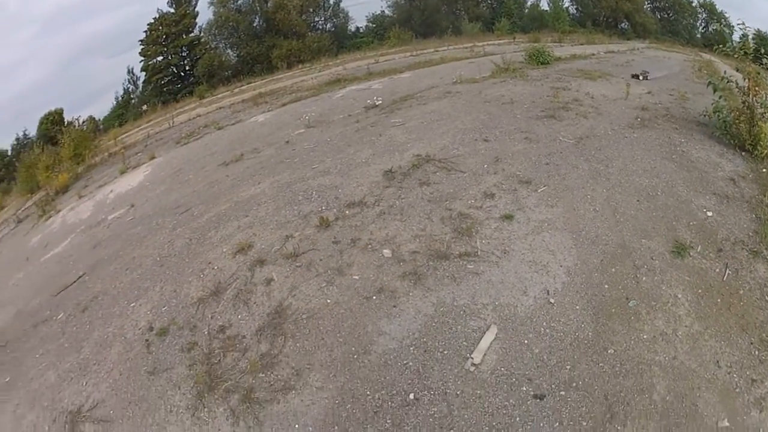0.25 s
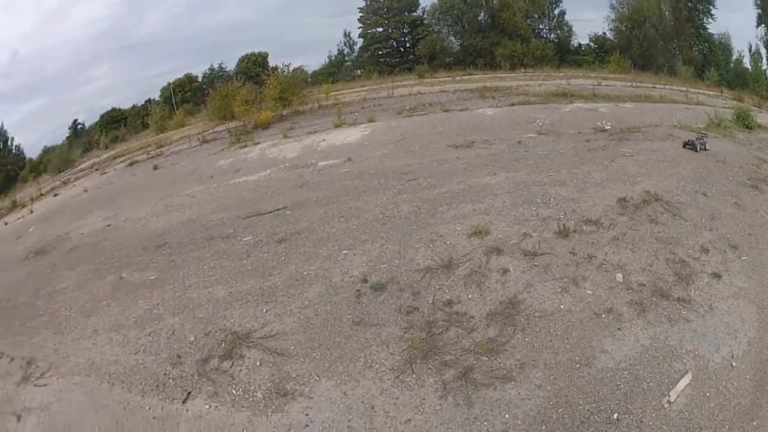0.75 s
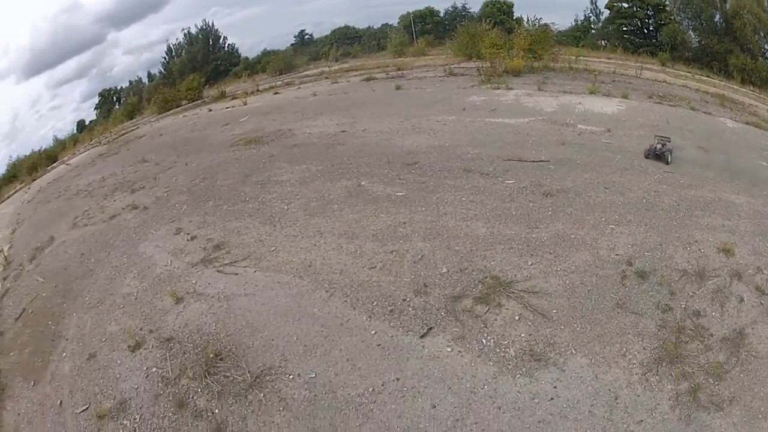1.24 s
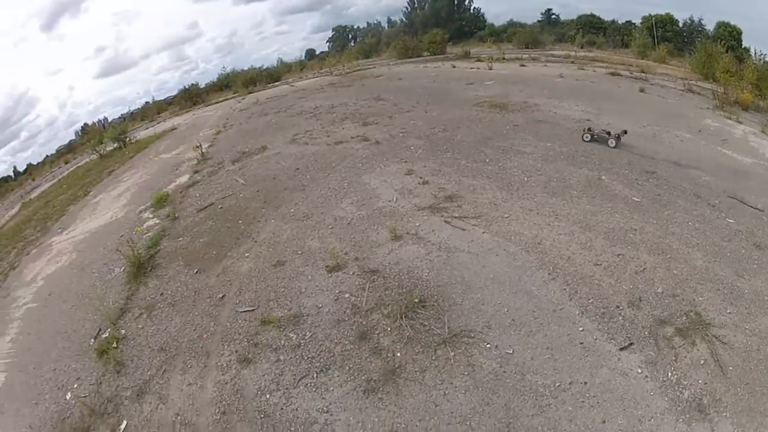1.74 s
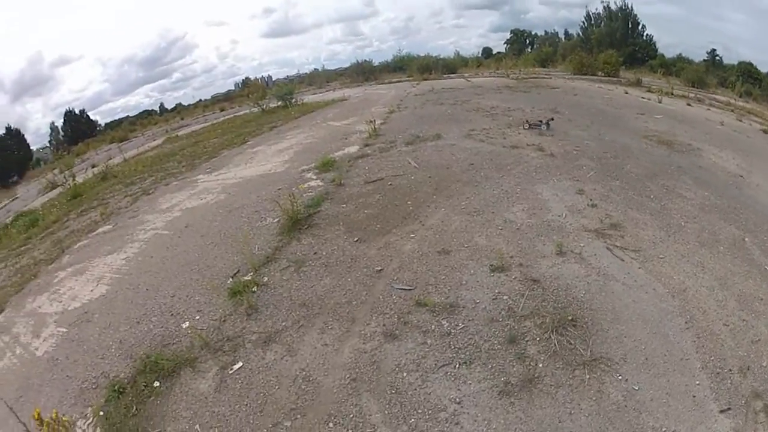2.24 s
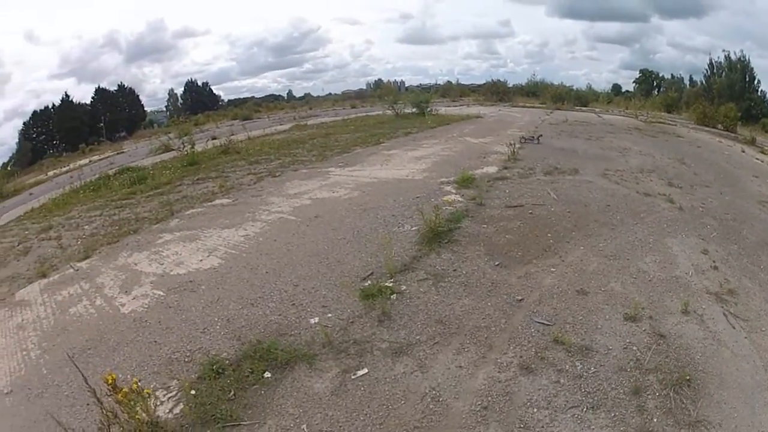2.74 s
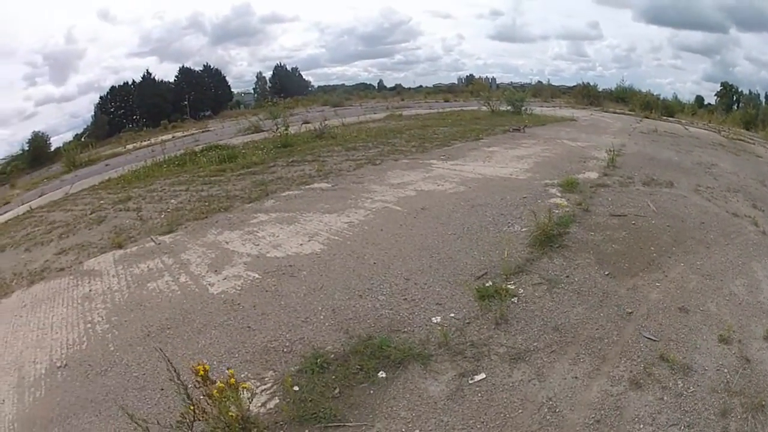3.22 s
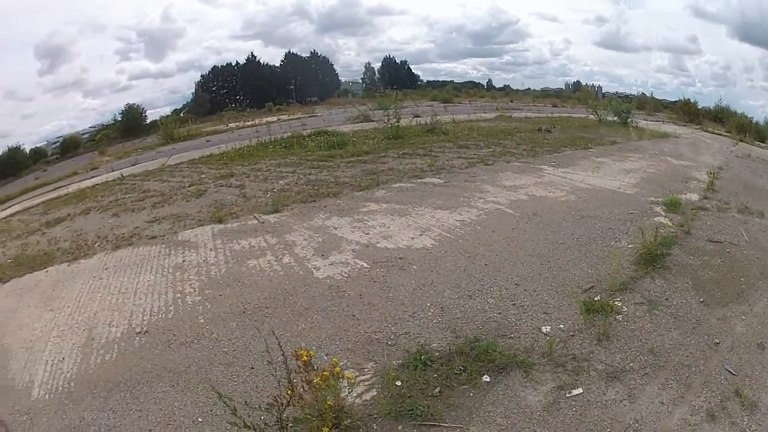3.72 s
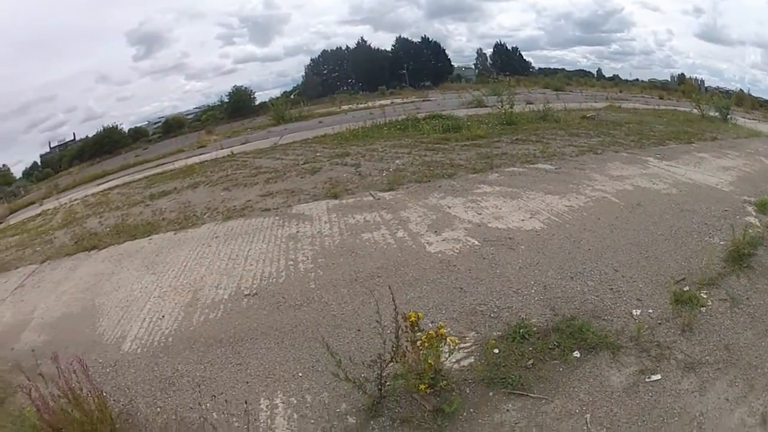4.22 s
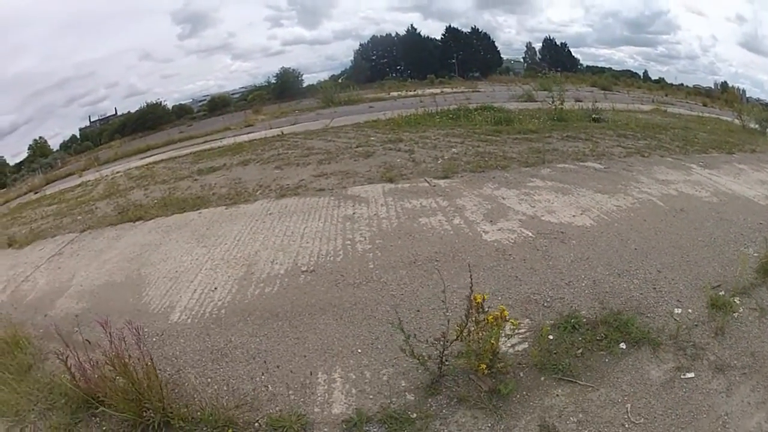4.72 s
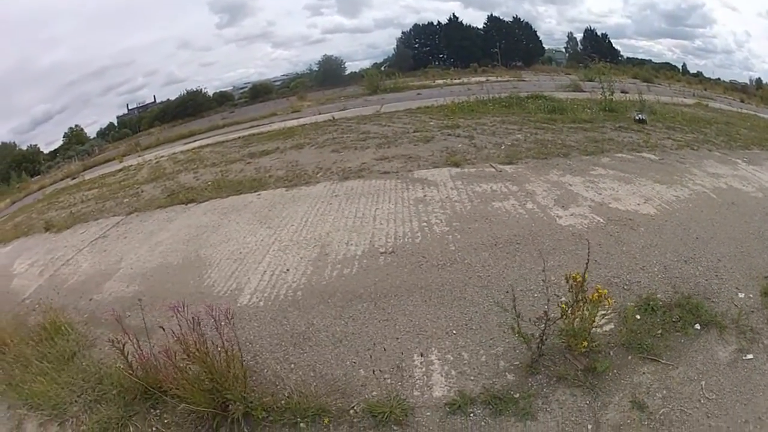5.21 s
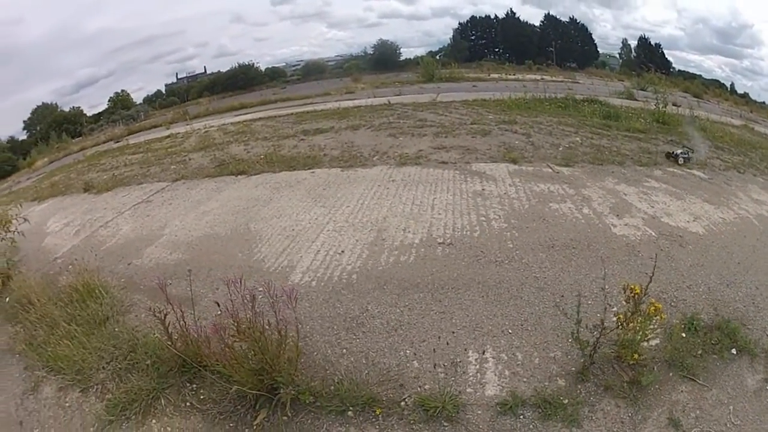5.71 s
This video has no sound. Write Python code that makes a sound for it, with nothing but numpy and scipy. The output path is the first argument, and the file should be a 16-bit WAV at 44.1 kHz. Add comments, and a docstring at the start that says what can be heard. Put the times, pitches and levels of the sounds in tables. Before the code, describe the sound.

A small fuel-powered model buggy races over gravelly tarmac outdoors, heard in mono. From the start its two-stroke engine buzzes and rasps at high, wavering revs, growing louder as it closes in during the first half second. Gears hiss above it, tyres scrub on grit, and a faint low rush lies underneath. The throttle blips near 0.9 seconds. At 2.1 seconds the car coasts and the pitch falls sharply, then barks back up at 2.3. At 3.1 it coasts longer, sinking to a quieter, rough burble, before picking up at 3.5. It runs farther away at steadier, lower revs, sounding fainter. Around 4.75 seconds a brief, thin gear whistle swells and fades as it turns. From 5 seconds it approaches again, louder, with quick rises and dips in pitch until the end at about 6 seconds.

```python
"""A nitro model buggy races over gravelly tarmac: its single two-stroke cylinder hums and rasps through
a tuned pipe, gears and tyres hiss above it. It closes in, coasts at 2.1 s and 3.1 s, each time followed
by a throttle blip, then runs out to 34 m. The gear case whistles as it turns back at 4.75 s, and it
closes in again. All is mono; a low-rate sample-and-hold mirrors the sound into the treble."""
import sys
import numpy as np
from scipy import signal
from scipy.fft import rfft, irfft
from scipy.io import wavfile
from scipy.ndimage import uniform_filter1d

SR = 44100
rng = np.random.default_rng(int(sys.argv[2]) if len(sys.argv) > 2 else 0)


def to_wav(s):
    """Save 16-bit WAV."""
    ch = np.atleast_2d(s).T  # columns
    pcm = np.round(np.clip(ch, -1, 1) * 32767)  # PCM
    wavfile.write(sys.argv[1], SR, pcm.astype(np.int16))


N = 262836
T = np.arange(N) / SR
FREQS = np.fft.rfftfreq(N, 1 / SR)
CRUISE_HZ = 310

# car's path: t/s, distance/m, pipe facing listener/0-1, lower and upper pipe mode at CRUISE_HZ/Hz
PATH = [(0, 19, 0.09, 1677, 2050), (.3, 12.6, .34, 1560, 2020), (.55, 8.4, 0.64, 1570, 2240),
        (1.1, 8.4, 0, 1676, 2070), (1.55, 10.2, 0.61, 1710, 2043), (1.8, 8.2, .58, 1593, 2155),
        (2.0, 9.4, .48, 1545, 2060), (2.6, 8.5, 0.67, 1540, 2154), (3.0, 10.24, 0.72, 1540, 2084),
        (3.35, 12.2, 0.55, 1672, 2182), (3.6, 23, 0.3, 1762, 2090), (3.85, 23, 0.62, 1483, 2020),
        (4.3, 33, 0.64, 1539, 2050), (4.55, 34, 0.58, 1786, 2080), (5.15, 21.5, 0.35, 1638, 2050),
        (5.32, 14.7, .25, 1738, 2048), (5.55, 10.5, 0.55, 1693, 2104), (5.96, 9.8, 0.63, 1667, 2040)]


def crank(firing_hz, rough, wobble=0.061, wobble_hz=26, shake=0.00905):
    """Crank angle in turns: the flywheel smooths, bouncing wheels rock the speed, firings vary."""
    bounce = unit(wander(7.64) * np.sin(2 * np.pi * wobble_hz * T))
    speed_ratio = 1 + wobble * rough ** 2 * bounce + shake * wander(170)
    return np.cumsum(uniform_filter1d(firing_hz, 350) * speed_ratio) / SR


def firings(turns, rough, jitter_turns=0.022, fade_db=2.5, shift_rad=0.9, smear_rad=0.3):
    """One uneven pulse a turn, smeared by the pipe; ground reflections fade and shift each order."""
    angle = 2 * np.pi * (turns + jitter_turns * rough * wander(89))
    pulses = np.zeros(N)
    for k in range(2, 20):
        fade = amp(fade_db * wander(14.4))
        pulses += fade * np.cos(k * angle + smear_rad * k * k + shift_rad * wander(4.1))
    return unit(pulses)


def exhaust(firing_hz, turns, pulses, rough, pull, muffler_db, lower_db, upper_db):
    """Pulses and gas noise pass the muffler, ring two pipe modes and bark under load."""
    # muffler and pipe responses: f/Hz, gain/dB
    muffler_gains = [(380, -15), (520, -9), (620, -9.5), (700, -3), (820, 0), (1050, 0), (1150, 1.5),
                     (1300, -10), (1500, -58)]
    pipe_gains = [(900, -30), (1100, -15), (1250, 10), (1400, 8), (1600, 6), (1850, 15.5), (2150, 6),
                  (2300, 3.5), (2480, -1.5), (2650, 0.5), (2950, -67), (3300, -41), (4000, -9)]
    strength = amp(2.0 * rough * wander(150))
    tone = (1 - rough) * strength * pulses
    gas = rough * strength * puffs(turns, floor=0.81, decay_turns=0.66)
    muffled = rfft(steady(colour(tone + 0.57 * gas, muffler_gains)))
    null_db = -5.5 * bell(FREQS, 958, 58)
    low_band = irfft(muffled * amp(null_db), N)
    bark = pull * amp(-9) * steady(irfft(muffled * bell(FREQS, 965, 280), N))
    drive = colour(tone + 0.76 * gas, pipe_gains)
    lower_hz, upper_hz = curves(PATH)[2:]
    rise_hz = firing_hz - CRUISE_HZ  # revs heat the gas and raise the modes
    lower = steady(resonate_twice(drive, lower_hz + 1.97 * rise_hz, width_hz=450))
    upper = steady(resonate_twice(drive, upper_hz + rise_hz, width_hz=500))
    return amp(muffler_db) * low_band + amp(lower_db) * (lower + bark) + amp(upper_db) * upper


def hum(turns, level_db, rough, flutter=0.21):
    """Firing fundamental from the pipe's mouth."""
    return amp(level_db) * np.sqrt(2) * np.sin(2 * np.pi * turns) * (1 + flutter * rough * wander(72))


def puffs(turns, floor, decay_turns):
    """Noise that bursts as the exhaust port opens, once a turn."""
    return unit((floor + np.exp(-(turns % 1) / decay_turns)) * rng.standard_normal(N))


def throttle(moves, travel_s=0.05):
    """Sum of throttle moves; each ramps in, holds and ramps out."""
    return sum(depth * np.clip(np.minimum(T - start_s, end_s - T) / travel_s + 0.5, 0, 1)
               for start_s, end_s, depth in moves)


def roughness(shut):
    """Uneven running, 0-1, raised by coasting and broken ground."""
    # broken ground: centre t/s, half length/s, added roughness/0-1
    bumps = [(.45, 0.38, 0.21), (0.936, 0.13, 0.25), (1.069, 0.052, 0.15), (1.63, 0.08, 0.33),
             (2.76, 0.53, 0.23), (4.18, 0.37, 0.2)]
    ground = sum(added * bell(T, centre_s, half_s) for centre_s, half_s, added in bumps)
    return np.clip(0.32 + 0.39 * shut + ground, 0, 1)


def exhaust_levels_db(firing_hz, shut, pull, near_m=10, settle_s=0.76):
    """Levels of hum, muffler and both pipe modes from distance, throttle, heading and revs."""
    # level laws: at near_m/dB, distance doubling/dB, shut/dB, pull/dB, facing/dB, over-rev/(dB/Hz)
    hum_law = (-24, -2.7, -14, .7, 8.7, -0.037)
    muffler_law = (-32, -0.64, -2, -2.5, -7, 0.0348)
    lower_law = (-19, -5.5, -13.5, -1.5, -0.3, -0.04)
    upper_law = (-21, -5, -7, 1.5, 5, 0.03)
    distance_m, facing = curves(PATH)[:2]
    over_rev_hz = firing_hz - uniform_filter1d(firing_hz, int(settle_s * SR))
    causes = np.array([np.ones(N), np.log2(distance_m / near_m), shut, pull, facing - 0.5, over_rev_hz])
    return np.array([hum_law, muffler_law, lower_law, upper_law]) @ causes


def drivetrain(turns, pulses, rough, hiss_db, ring_db=7.5, patch_db=3.0, flicker_db=0.67):
    """Gears hiss and buzz with the crank, ring in two bands and flicker as the wheels skip."""
    # gear hiss spectrum: f/Hz, gain/dB
    hiss_gains = [(2400, -11.5), (2950, -18), (3250, -9), (3550, -0.5), (3900, 2), (4200, 4), (4700, 2.5),
                  (5100, 2), (5500, -0.5), (5800, -7), (6200, -86)]
    # ringing bands: t/s, lower f/Hz, upper f/Hz
    ring_bands = [(0, 4200, 5440), (.5, 3850, 4830), (1.4, 4026, 5580), (1.8, 4216, 4850),
                  (2.33, 3950, 4560), (2.6, 3760, 4600), (2.95, 3780, 4548), (3.5, 4009, 4816),
                  (5.0, 4202, 4971), (5.3, 4400, 4492), (5.68, 4275, 4864), (5.96, 4034, 4994)]
    buzz = 0.72 * (1 - rough) * pulses
    rattle = colour(puffs(turns, floor=0.63, decay_turns=0.64) + buzz, hiss_gains)
    rings = sum(resonate(rattle, hz, width_hz=170) for hz in curves(ring_bands))
    spectrum = rfft(2.77 * rattle + amp(ring_db) * rings)
    bands = [np.clip(1 - abs(FREQS - hz) / 600, 0, 1) for hz in range(1800, 6601, 600)]
    patchy = sum(irfft(spectrum * band, N) * amp(patch_db * wander(8.2)) for band in bands)
    return amp(hiss_db + 1.35) * steady(patchy) * amp(flicker_db * wander(81))


def gear_whistle(hiss_db, peak_s=4.75, half_s=0.15, centre_hz=4070, glide_hz_per_s=250):
    """A narrow, fuzzy ring of the gear case swells, glides up and fades."""
    hz = centre_hz + glide_hz_per_s * np.clip(T - peak_s, -2 * half_s, 2 * half_s)
    ring = resonate_twice(rng.standard_normal(N), hz, width_hz=75)
    return amp(hiss_db + 0.77) * bell(T, peak_s, half_s) * steady(ring, samples=900)


def tyre_scrub(pipe_db, grains_per_s=3000, spread_db=3.5):
    """Grit scrubs under the driven wheels; its level follows the pipe's."""
    # scrub spectrum: f/Hz, gain/dB
    scrub_gains = [(150, -11.5), (230, -2.5), (330, -3), (450, -6.5), (600, -6.5), (800, -4.5),
                   (1100, -4.5), (1500, 1), (2300, 4), (2700, -54)]
    grains = rng.standard_normal(N) * amp(spread_db * np.minimum(rng.exponential(1, N), 5))
    grains *= rng.random(N) < grains_per_s / SR
    return unit(colour(grains, scrub_gains)) * amp(pipe_db - 8.5)


def rolling_rush():
    """Low rush of air and rolling tyres."""
    # rush spectrum: f/Hz, gain/dB
    rush_gains = [(15, -25), (30, -11), (48, -4), (63, 3), (95, -3), (150, -0.5), (220, -4), (400, -10.5),
                  (900, -18)]
    # rush envelope: t/s, level/dB
    rush_levels = [(0, -41), (1.0, -43.5), (1.15, -47.5), (2.0, -48.5), (3.3, -43), (3.7, -44.5),
                   (5.96, -47)]
    return unit(colour(rng.standard_normal(N), rush_gains)) * amp(curves(rush_levels)[0])


def amp(db):
    return 10 ** (np.asarray(db) / 20)


def unit(x):
    """Scale to rms 1."""
    return x / np.sqrt(np.mean(x ** 2) + 1e-20)


def steady(x, samples=2600):
    """Hold the short-time rms at 1."""
    return x / np.sqrt(np.abs(uniform_filter1d(x ** 2, samples)) + 1e-12)


def bell(x, centre, half_width):
    """Gaussian of height 1."""
    return np.exp(-((x - centre) / half_width) ** 2)


def curves(rows):
    """A time table's value columns, per sample."""
    times_s, *columns = np.transpose(rows)
    return [np.interp(T, times_s, column) for column in columns]


def colour(x, gains):
    """Filter by rows of f/Hz, gain/dB."""
    hz, db = np.transpose(gains)
    gain_db = np.interp(np.log(FREQS + 1), np.log(hz), db, left=-70, right=-70)
    return irfft(rfft(x) * amp(gain_db), N)


def wander(cutoff_hz, step=32):
    """Low-passed random drift of rms 1."""
    slow_t = T[::step]
    rolloff = bell(np.fft.rfftfreq(len(slow_t), step / SR), 0, cutoff_hz)
    drift = irfft(rfft(rng.standard_normal(len(slow_t))) * rolloff, len(slow_t))
    return np.interp(T, slow_t, unit(drift))


def resonate(x, hz, width_hz):
    """Unity-gain resonance that follows the curve hz."""
    carrier = np.exp(2j * np.pi * np.cumsum(hz) / SR)
    pole = np.exp(-np.pi * width_hz / SR)
    return 2 * (carrier * signal.lfilter([1 - pole], [1, -pole], x / carrier)).real


def resonate_twice(x, hz, width_hz):
    """Two equal resonances in series."""
    return resonate(resonate(x, hz, width_hz), hz, width_hz)


def scene():
    """The crank times engine and gears; throttle, path and ground set level and roughness."""
    # engine speed: t/s, firing rate/Hz
    revs = [(0.0, 364.5), (0.03, 370.7), (0.08, 334), (0.15, 354.3), (0.23, 348.3), (0.28, 371.4),
            (0.38, 340.4), (0.41, 355.5), (0.76, 346.9), (0.85, 375), (0.94, 340.4), (1.04, 353),
            (1.14, 324.1), (1.34, 331.8), (1.41, 320.6), (1.49, 340.9), (1.56, 323.3), (1.66, 328.3),
            (1.78, 300.2), (1.87, 315), (2.07, 330.2), (2.14, 274.8), (2.26, 208.4), (2.27, 220.7),
            (2.32, 296.9), (2.39, 285.6), (2.46, 317.6), (2.51, 292.6), (2.56, 298.2), (2.61, 321.5),
            (2.72, 317), (2.8, 332), (2.89, 317), (3.0, 334.2), (3.1, 284), (3.2, 209), (3.25, 194.4),
            (3.35, 188), (3.44, 206), (3.5, 243.6), (3.54, 254), (3.72, 254), (3.8, 277.1), (4.57, 264.7),
            (4.81, 271.4), (4.86, 284.4), (4.93, 281), (4.98, 302), (5.06, 277.5), (5.23, 291), (5.28, 316),
            (5.33, 319.2), (5.38, 285.5), (5.46, 319.8), (5.53, 281.2), (5.66, 337), (5.71, 339.2),
            (5.76, 296.3), (5.79, 295.3), (5.96, 310.2)]
    # throttle lifts: start/s, end/s, closure/0-1
    lifts = [(1.12, 1.173, 0.16), (2.111, 2.275, 0.78), (3.03, 3.125, 0.12), (3.118, 3.465, 0.78),
             (5.03, 5.21, 0.13)]
    # throttle blips: start/s, end/s, pull/0-1
    blips = [(.83, .95, 0.54), (1.74, 1.86, 0.11), (2.285, 2.57, 0.8), (3.48, 3.74, 0.34),
             (5.48, 5.54, 0.46)]
    # gear hiss envelope: t/s, relative level/dB
    hiss_levels = [(0.02, -21.5), (0.2, -20), (0.33, -21), (0.9, -22.5), (0.94, -18), (1.11, -24),
                   (1.51, -20.5), (2.1, -23), (2.27, -27), (2.32, -19), (2.43, -24), (3.1, -23),
                   (3.33, -41), (3.54, -33), (3.86, -27), (4.49, -28), (4.9, -24.5), (5.1, -25.5),
                   (5.31, -21), (5.4, -22), (5.96, -19)]
    firing_hz, hiss_db = curves(revs)[0], curves(hiss_levels)[0]
    shut, pull = throttle(lifts), throttle(blips)
    hum_db, muffler_db, lower_db, upper_db = exhaust_levels_db(firing_hz, shut, pull)
    rough = roughness(shut)
    turns = crank(firing_hz, rough)
    pulses = firings(turns, rough)
    engine = hum(turns, hum_db, rough)
    engine += exhaust(firing_hz, turns, pulses, rough, pull, muffler_db, lower_db, upper_db)
    gears = drivetrain(turns, pulses, rough, hiss_db) + gear_whistle(hiss_db)
    car = engine + gears + tyre_scrub((lower_db + upper_db) / 2) + rolling_rush()
    return np.array([car, car])


def record(dry, band_hz=5800, hold_hz=12000, edge_hz=14700):
    """Band limit, sample-and-hold with mirror images around hold_hz, final low-pass."""
    band_fir = signal.firwin(201, band_hz, window=("kaiser", 7), fs=SR)
    edge_fir = signal.firwin(511, edge_hz, window=("kaiser", 9), fs=SR)
    narrow = signal.oaconvolve(dry, band_fir[None], "same")
    mirrored = narrow * (1 + 2 * np.cos(2 * np.pi * hold_hz * T))
    held = irfft(rfft(mirrored) * np.sinc(FREQS / hold_hz), N) * amp(0.89)
    return signal.oaconvolve(held, edge_fir[None], "same")


dry = scene()
out = record(dry)
to_wav(out)
```